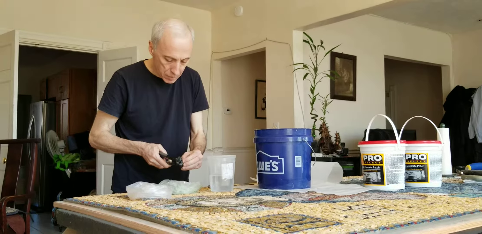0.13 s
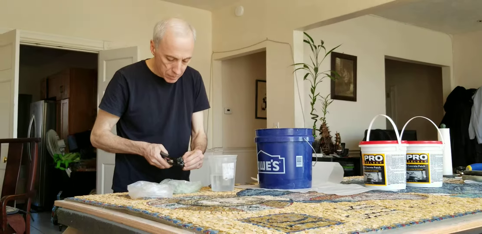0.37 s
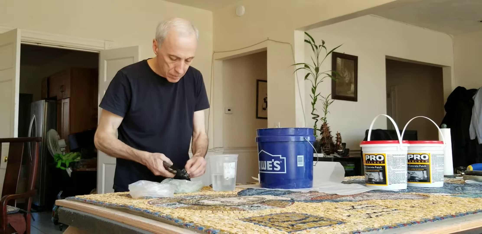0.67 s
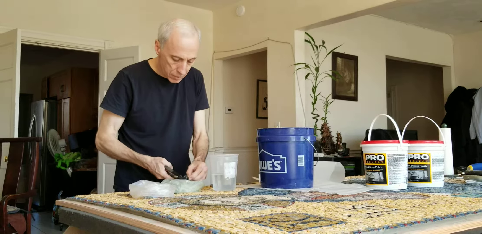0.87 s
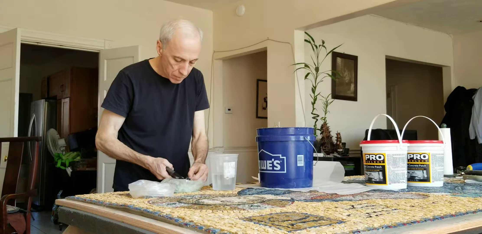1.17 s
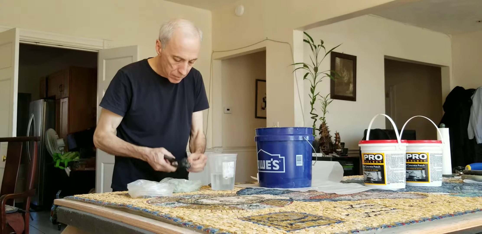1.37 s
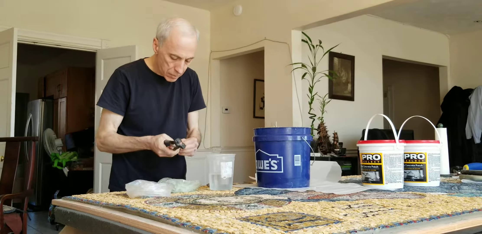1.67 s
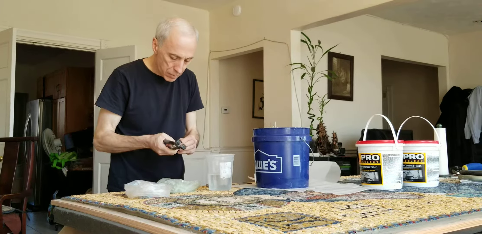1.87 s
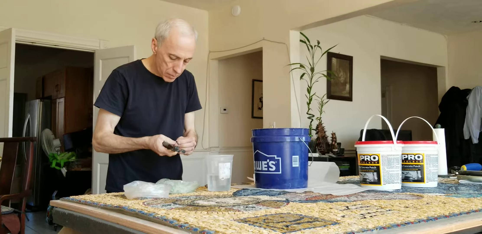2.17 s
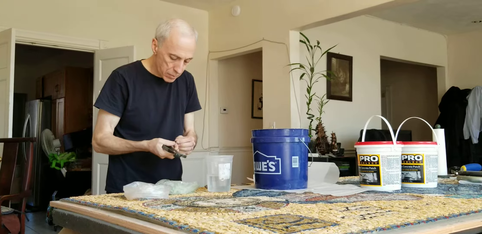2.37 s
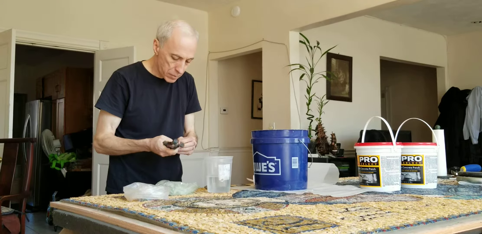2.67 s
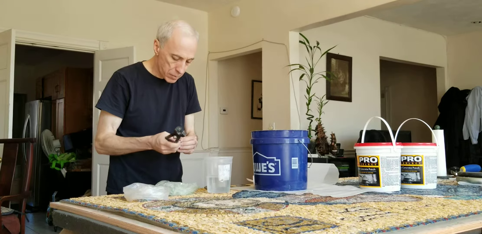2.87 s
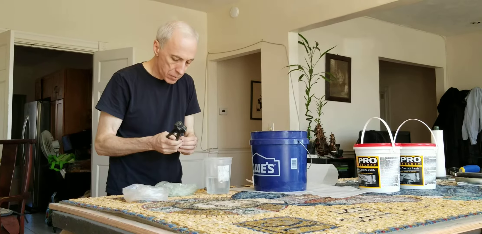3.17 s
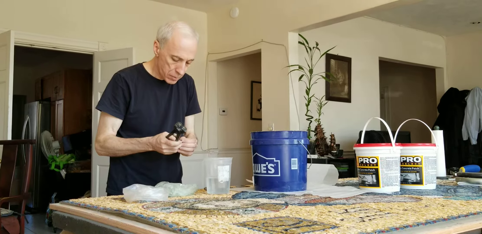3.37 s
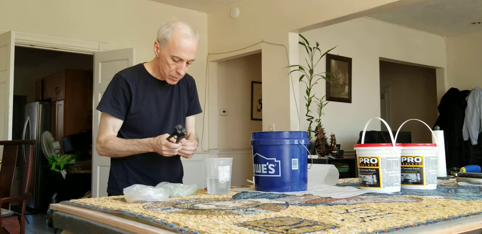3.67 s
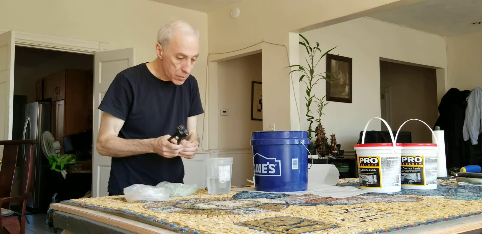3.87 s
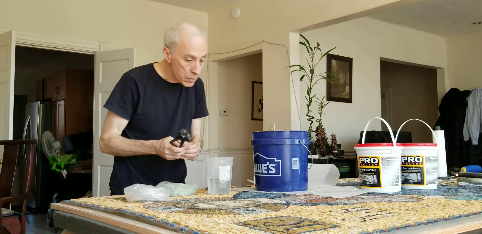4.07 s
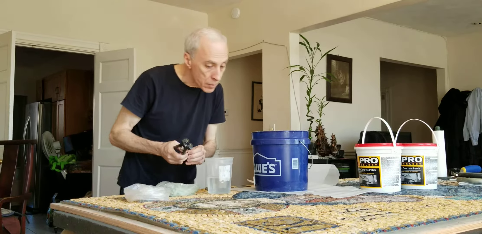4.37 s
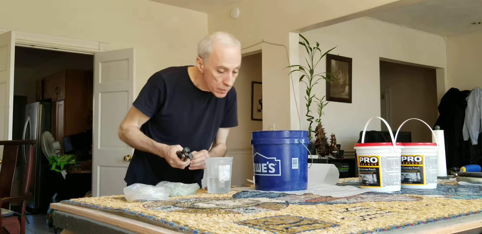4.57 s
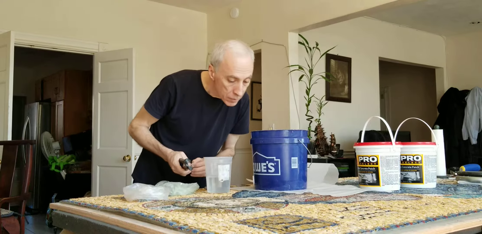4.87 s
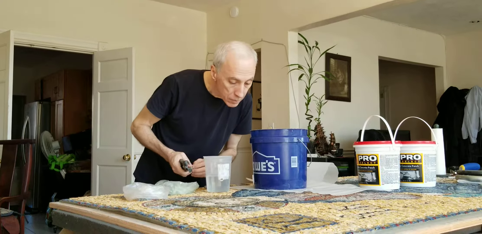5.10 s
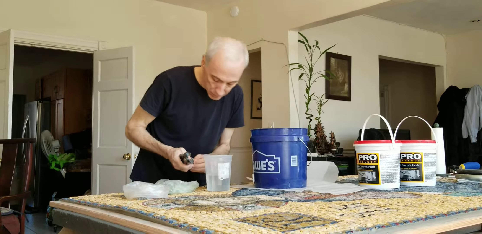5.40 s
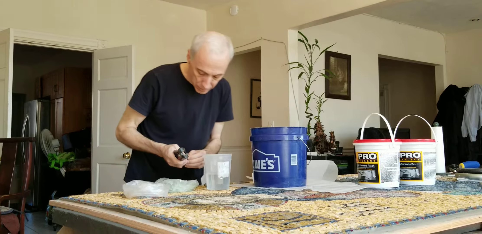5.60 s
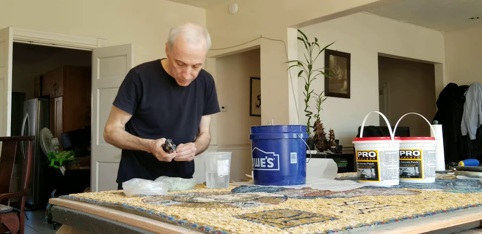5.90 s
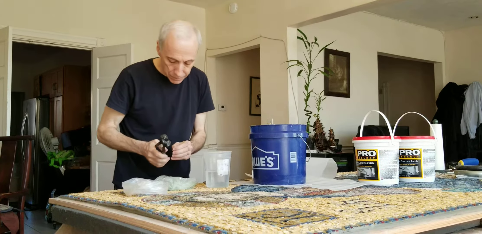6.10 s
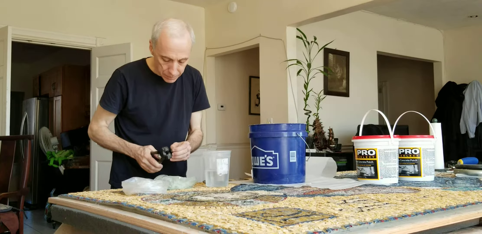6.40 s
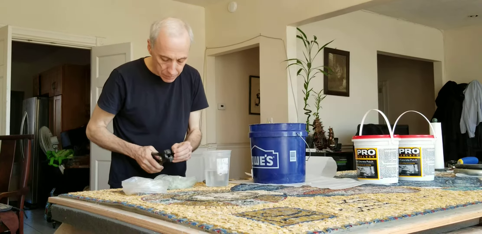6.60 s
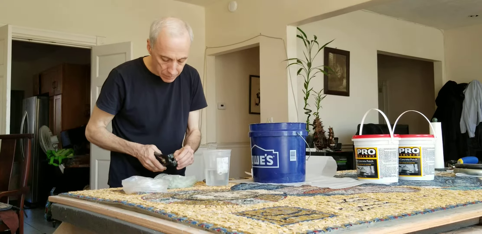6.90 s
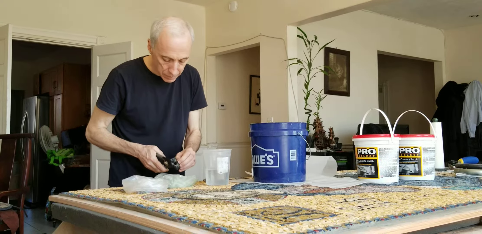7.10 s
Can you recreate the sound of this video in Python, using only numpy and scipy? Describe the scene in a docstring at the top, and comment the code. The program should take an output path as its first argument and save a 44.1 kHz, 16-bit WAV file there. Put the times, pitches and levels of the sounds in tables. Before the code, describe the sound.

In a living room, hand nippers make two thin, bright ticks on a mosaic tile, then one very loud sharp crack that echoes briefly off the walls. A faint two-note squeal and an engine drone with a slight whistle precede it outside. Afterwards the background is pushed down for a couple of seconds, then recovers to soft traffic rumble, hiss, bird chirps, a low floor thud and tiny chip ticks. Stereo microphone across the table.

```python
"""Hand nippers bite a small mosaic tile in a living room: it ticks twice under the jaws, snaps, and chips tick later.
The cracks ring the tile and jaws and echo in the room; a soft thud on the wooden floor follows.
An engine drones with a faint whistle that rises and falls, and shaped noise makes traffic outside and a hiss.
A two-note squeal and birds, made of gliding tones, come from far off.
After the snap a gain control ducks everything for a few seconds, then brings most of the level back."""
import sys
import numpy as np
from scipy import signal
from scipy.fft import rfft, irfft, next_fast_len
from scipy.io import wavfile
from scipy.ndimage import uniform_filter1d, minimum_filter1d, map_coordinates

SR = 44100
rng = np.random.default_rng(int(sys.argv[2]) if len(sys.argv) > 2 else 0)


def inscribe(sig):
    """Save sig as 16-bit PCM at rate SR to the path in sys.argv[1].

    A 1-D sig is mono; a 2-D sig holds one channel per row.
    Samples are clipped to [-1, 1] before scaling.
    """
    pcm = np.round(np.clip(np.atleast_2d(sig).T, -1, 1) * 32767)
    wavfile.write(sys.argv[1], SR, pcm.astype(np.int16))


N = 319725  # length of the scene in samples


def amp(db):
    """Turn decibels into a gain."""
    return 10 ** (np.asarray(db) / 20)


def unit(x):
    """Scale a signal to an rms (average strength) of 1."""
    return x / np.sqrt(np.mean(x ** 2) + 1e-20)


def along(points, hz):
    """Read a curve of (Hz, value) points at the given frequencies, on a log frequency axis."""
    point_hz, values = np.transpose(points)
    return np.interp(np.log(hz + 1), np.log(point_hz + 1), values)


def curves(rows):
    """Draw straight lines between timed rows: one value per sample for each column after the time."""
    times_s, *columns = np.transpose(rows)
    return [np.interp(np.arange(N) / SR, times_s, column) for column in columns]


def wobble(rate):
    """Make a smooth random curve with this many random knots a second."""
    knots = rng.standard_normal(int(N * rate / SR) + 4)
    return map_coordinates(knots, [np.arange(N) * rate / SR])


def phase(hz):
    """Add up a moving frequency into the running phase of its wave."""
    return 2 * np.pi * np.cumsum(hz) / SR


def filtered(x, response):
    """Filter a signal by multiplying its spectrum by a response of frequency."""
    size = next_fast_len(N + SR // 2)
    hz = np.fft.rfftfreq(size, 1 / SR)
    return irfft(rfft(x, size) * response(hz), size)[..., :N]


def rush(spectrum):
    """Make stereo noise of rms 1, alike on both sides in the bass and nearly unrelated in the treble."""
    # how alike left and right are: pitch_hz, likeness (1 = identical)
    likeness = [(60, 0.99), (200, .93), (400, .72), (800, .42), (1300, .42), (2500, 0.11), (6000, 0.041)]

    def mid_and_side(hz):
        turn = np.arccos(np.clip(along(likeness, hz), 0, 1)) / 2
        return amp(along(spectrum, hz)) * [np.cos(turn), np.sin(turn)]

    mid, side = filtered(rng.standard_normal((2, N)), mid_and_side)
    return unit(np.array([mid + side, mid - side]))


def reverb(x, build=0.0073):
    """The room's blurred answer: it builds up (build in s), then fades, at most pitches sooner in the treble."""
    # how long the room rings: pitch_hz, time_s to fade by 60 dB
    fade_times = [(200, .5), (1500, 0.38), (3000, .43), (5500, .39), (8000, 0.35), (14000, 0.22)]
    hz, t, grains = signal.stft(rng.standard_normal((2, SR * 3 // 4)), SR, nperseg=256)
    fade = amp(-60 * t / along(fade_times, hz)[:, None])
    rise = 1 - np.exp(-(t / build) ** 2)
    tail = signal.istft(grains * fade * rise, SR, nperseg=256)[1]
    return signal.fftconvolve(x[None], tail / np.linalg.norm(tail[0]), axes=1)[:, :N]


def strikes(events, modes, low_hz, room_db, echo_db):
    """Sudden releases of stress ring the modes; they arrive directly, off near walls, and through the room."""
    # early echoes from table, ceiling and walls: delay_s, left_db, right_db (before echo_db)
    echoes = [(.0067, -1, -4), (.0125, -1, -3), (.0178, -2, -7), (.0212, -5, -9), (.027, -7, -11),
              (.04, -11, -9)]
    size = 4096
    hz = np.fft.rfftfreq(size, 1 / SR)
    body = 0
    for k, (mode_hz, width_hz, db) in enumerate(modes):
        resonance = 1j * hz * width_hz / (mode_hz ** 2 - hz * hz + 1j * hz * width_hz)
        body = body + (-1) ** k * amp(db) * resonance  # neighbours have opposite signs
    # the struck piece radiates little bass below low_hz
    body = body * (1j * hz) ** 2 / (low_hz ** 2 - hz * hz + 1j * hz * low_hz)

    source, direct = np.zeros(N + size), np.zeros((2, N + size))
    for start_s, db, tilt_db, pan_db in events:
        start = round(start_s * SR)
        octaves_up = np.log2(np.maximum(hz, low_hz) / low_hz)
        ring = irfft(body * amp(tilt_db * octaves_up))
        # equal energy for equal level, whatever the colour
        ring *= amp(db) * np.sqrt(SR / 1000) / np.linalg.norm(ring)
        source[start:][:size] += ring
        direct[:, start:][:, :size] += amp([[pan_db / 2], [-pan_db / 2]]) * ring

    # rough surfaces smear each echo over a moment
    t = np.arange(size) / SR
    walls = np.zeros((2, size))
    for delay_s, left_db, right_db in echoes:
        fade = (t >= delay_s) * np.exp(-abs(t - delay_s) / .002)
        smear = rng.standard_normal((2, size)) * fade
        walls += amp([[left_db], [right_db]]) * smear / np.linalg.norm(smear, axis=1, keepdims=True)
    early = signal.fftconvolve(source[None], walls, axes=1)
    return direct[:, :N] + amp(echo_db) * early[:, :N] + amp(room_db) * reverb(source[:N])


def passing(nearest, half):
    """Gain of something going by in a straight line (nearest at s, s until half power): one over its distance."""
    return 1 / np.hypot(1, (np.arange(N) / SR - nearest) / half)


def street():
    """Traffic outside: rumble, exhaust and tyre noise swell as each vehicle nears, over a steady hiss."""
    # vehicles go by: nearest_s, half_power_s, rumble_db, exhaust_db, tyres_db (levels when nearest)
    vehicles = [(.3, 1.2, -50.5, -45, -48.5), (4.102, 1.8, -42, -49.5, -44.7),
                (5.051, .55, -42.5, -47, -59), (7.201, .8, -43.5, -51.5, -52.5)]
    # noise spectra: pitch_hz, relative level_db per Hz
    rumble = [(15, -26), (27, -10), (37, 0.5), (50, -1), (70, -13.5), (87, -2), (105, -21), (200, -49.5),
              (600, -120)]
    exhaust = [(40, -19), (60, -2.5), (105, -0.5), (128, -2.5), (160, 1), (200, 1), (260, -4), (340, -9),
               (600, -25), (2000, -120)]
    tyres = [(160, -33.5), (280, -15), (400, 2.5), (560, -2), (860, 1.5), (1250, -3.5), (1790, -14),
             (2600, -25.5), (3900, -34), (5200, -33), (7000, -45), (11000, -120)]
    hiss = [(1760, -30), (3000, -10), (4860, -7), (7620, -7), (9140, -13), (12500, -3.5), (15100, -4.5),
            (16000, -7)]
    power = 0
    for nearest, half, *levels_db in vehicles:
        power = power + np.outer(amp(levels_db), passing(nearest, half)) ** 2
    sound = amp(-67) * rush(hiss)
    for gain, spectrum in zip(np.sqrt(power), [rumble, exhaust, tyres]):
        sound = sound + gain * rush(spectrum)
    return sound


def birds():
    """Two-note chirps and thin whistles: short raspy tones that glide or stay level, softened by the room."""
    # one bird's falling chirps: start_s, start_hz, level_db, lead_note_db
    chirps = [(2.038, 3830, -63, -81), (2.41, 3850, -69, -85), (2.608, 3480, -59, -68),
              (3.728, 3930, -54.5, -62.5), (4.566, 3530, -57, -67.5), (5.784, 3440, -52.5, -74.5),
              (6.36, 3850, -58, -61.5)]
    # another bird's thin level whistles: start_s, length_s, pitch_hz, level_db
    whistles = [(1.272, 0.18, 10460, -61.5), (1.58, 0.095, 10300, -61.5), (1.973, 0.11, 10440, -68),
                (2.4, 0.09, 8550, -65), (2.4, .44, 8080, -76.5), (4.612, 0.14, 8720, -75.5),
                (6.357, .06, 7470, -66)]
    chirp_s, chirp_fall = .062, .14  # fall: share of its pitch that a note loses
    # a higher, softer note starts this long before each chirp
    lead_s, lead_hz, lead_fall = 0.058, 4720, 0.1
    notes = [(s, length_s, hz, 0, db) for s, length_s, hz, db in whistles]
    for s, hz, db, lead_db in chirps:
        notes.append((s, chirp_s, hz, chirp_fall, db))
        notes.append((s - lead_s, chirp_s, lead_hz, lead_fall, lead_db))

    song = np.zeros(N + SR)
    rasp_hz = 130 * wobble(500)  # fast random shake of the pitch
    for start_s, length_s, start_hz, fall, db in notes:
        start = round(start_s * SR)
        u = np.linspace(0, 1, max(round(length_s * SR), 2))  # 0 to 1 through the note
        hz = start_hz * (1 - fall * u) + np.roll(rasp_hz, -start)[:len(u)]
        song[start:][:len(u)] += amp(db) * np.sin(np.pi * u) * np.sin(phase(hz))
    return song[:N] + amp(-3) * reverb(song[:N])


def squeal():
    """Two far notes that start sharp and sag to a common pitch, with weak overtones."""
    # start_s, length_s, sharp_hz at the start, level_db, second and third harmonic_db (below the note)
    squeals = [(0.127, 0.18, 62, -38.5, -13.5, -19.5), (0.347, .17, 21, -41, -26, -20)]
    final_hz, settle_s = 853, 0.041  # the pitch each note sinks to, and how fast
    attack_s, release_s = 0.02, 0.025
    tone = np.zeros(N)
    for start_s, length_s, sharp_hz, db, second_db, third_db in squeals:
        t = np.maximum(np.arange(N) / SR - start_s, 0)
        hz = final_hz + sharp_hz * np.exp(-t / settle_s)
        turn = phase(hz * (1 + .008 * wobble(150)))  # the pitch trembles
        note = np.sin(turn) + amp(second_db) * np.sin(2 * turn) + amp(third_db) * np.sin(3 * turn)
        envelope = np.clip(np.minimum(t / attack_s, (length_s - t) / release_s), 0, 1)
        tone += amp(db) * envelope * note
    return tone + amp(-7) * reverb(tone)


def engine():
    """A wavering drone; load adds its third harmonic, a clatter and a faint whistle, which fade as it drives off."""
    # the engine speeds up twice and eases off: time_s, whistle_hz (before its flutter)
    revs = [(0, 5120), (1.15, 6330), (2.1, 5814), (2.75, 5484), (3.95, 5880), (5.2, 5510), (7.25, 4276)]
    # how it goes by: nearest_s, half_power_s
    drive_by = (0.52, .5)
    # the drone swells: time_s, half_width_s, rise_db over its steady level
    swells = [(.84, 0.19, 6), (5.55, 0.18, 2.5), (7.17, 0.15, 9)]
    # clatter spectrum: pitch_hz, relative level_db per Hz
    rattle = [(200, -23), (350, 13.5), (700, -3.5), (1400, -8.5), (2200, -6), (2800, -2.5), (3700, -5),
              (5500, -13.5), (8000, -22.5), (12000, -55)]
    cruise_hz, load_db_per_octave = 5755, 22.5  # load grows with engine speed
    t = np.arange(N) / SR
    whistle_hz, = curves(revs)
    load = amp(load_db_per_octave * np.log2(whistle_hz / cruise_hz)) * passing(*drive_by)

    firing_hz = (64.6 - 1.9 * load) * (1 + .014 * wobble(7))
    firing = phase(firing_hz)
    drone_db = -41.5 + 1.9 * wobble(11)
    for time_s, half_width_s, rise_db in swells:
        drone_db = drone_db + rise_db * np.exp(-((t - time_s) / half_width_s) ** 2)
    drone = amp(drone_db) * unit(np.sin(firing))
    third = amp(-44.5) * load ** 2 * unit(np.sin(3 * firing))

    # the whistle flutters in pitch, and comes and goes
    spin = np.sin(phase(whistle_hz * (1 + .008 * wobble(400))))
    whistle = amp(-65.5 + 2.5 * wobble(12)) * load * unit(reverb(spin))
    clatter = amp(-50.5) * load * rush(rattle)
    return drone + third + whistle + clatter


def thud():
    """The weight shifts and the wooden floor answers with a soft low ring."""
    # start_s, level_db, brightness in dB per octave, left_right_db
    shifts = [(5.866, -38, -9, 0)]
    # ringing of the floor: pitch_hz, width_hz, level_db
    floor = [(206, 41, -2.5), (260, 47, 3), (420, 110, -26)]
    return strikes(shifts, floor, low_hz=119, room_db=-4.0, echo_db=0.5)


def nippers():
    """Two thin bites ring the gripped tile; then it breaks, ringing with the jaws, and small chips tick."""
    # the jaws bite in: start_s, level_db, brightness in dB per octave, left_right_db
    bites = [(.7667, -30.5, -1.5, 3), (.7683, -35, -2.5, 19), (.8722, -24.5, 1, 5), (.8739, -29, -1.5, 16)]
    # the break and the later chips: same columns
    cracks = [(1.0053, -25, -4, -19), (1.0091, -6.5, 0.5, 5), (1.0098, -14, 11, 23),
              (1.0158, -10.5, 7.5, 1), (1.3748, -50, 15, 16.5), (4.178, -61.5, -0.5, -3.5),
              (6.0792, -48.5, 3, 10), (6.112, -59, 4, -2), (7.025, -61, 8, 7.5)]
    # ringing of the gripped tile: pitch_hz, width_hz, level_db
    gripped = [(4180, 4200, -26), (6414, 170, -0.5), (6940, 48, 0.5), (7500, 47, 3), (11000, 4500, -18),
               (14500, 2200, -11)]
    # ringing of tile and jaws at the break: same columns
    tile = [(974, 110, -16), (2000, 260, -4.5), (2530, 130, -3.5), (2720, 160, -1.5), (3920, 310, -1.5),
            (4300, 240, -5.5), (5080, 180, -2.5), (5360, 120, 3), (5800, 2500, -7.5), (7250, 600, -3.5),
            (7440, 300, 3), (8250, 130, 1), (8600, 550, -10), (11500, 1500, -8), (13510, 380, 3.5),
            (15000, 730, -3.5)]
    biting = strikes(bites, gripped, low_hz=2500, room_db=-0.5, echo_db=-2)
    breaking = strikes(cracks, tile, low_hz=1400, room_db=11, echo_db=4)
    return biting + breaking


def scene():
    """The work at the table over the sounds from outside."""
    return street() + birds() + squeal() + engine() + thud() + nippers()


def ducking(dry, threshold_db, hold, release, lasting):
    """Gain that drops at a loud sound, holds, then comes most of the way back (hold and release in s)."""
    power = abs(uniform_filter1d(np.mean(dry ** 2, axis=0), round(0.027 * SR)))
    excess_db = np.maximum(10 * np.log10(power + 1e-12) - threshold_db, 0)
    back, ramp = round(hold * SR / 2), round(release * SR / 2)
    # keep the largest excess of the last hold seconds, then let it go gradually
    held_db = -minimum_filter1d(-excess_db, 2 * back + 1, origin=back, mode="constant")
    cut_db = np.maximum(held_db, uniform_filter1d(held_db, 2 * ramp + 1, origin=ramp))
    # a share of the cut stays on
    lasting_db = lasting * np.maximum.accumulate(excess_db)
    return amp(-(1 - lasting) * cut_db - lasting_db)


def record(dry):
    """Gain control, a soft ceiling for the sharpest peak, a slight delay of the left treble, and a treble limit."""
    left_lag_s, lag_above_hz, top_hz = .00043, 880, 15900
    x = dry * ducking(dry, threshold_db=-17.0, hold=2.317, release=0.48, lasting=0.3)
    x = x / (1 + (x / .68) ** 6) ** (1 / 6)

    def delay_and_limit(hz):
        treble = 1 - 1 / (1 + (hz / lag_above_hz) ** 8)
        late_s = np.array([[left_lag_s], [0]]) * treble
        return np.exp(-2j * np.pi * hz * late_s) / (1 + (hz / top_hz) ** 200)

    return filtered(x, delay_and_limit)


dry = scene()
out = record(dry)
inscribe(out)
```